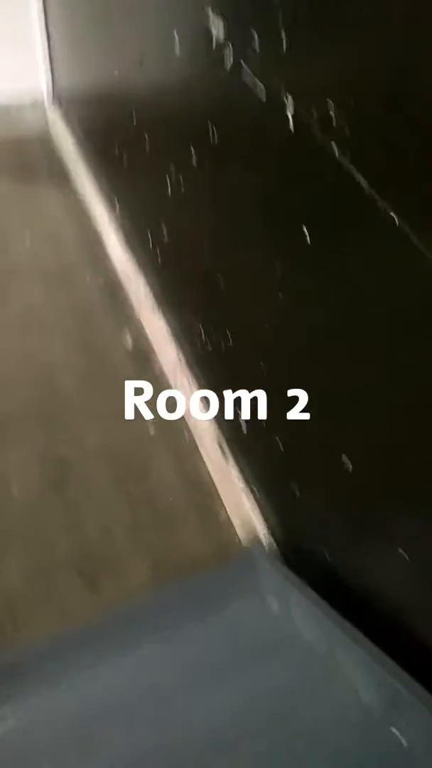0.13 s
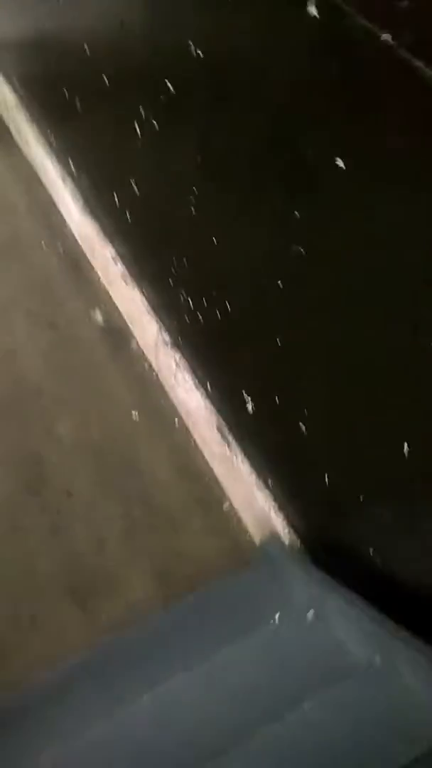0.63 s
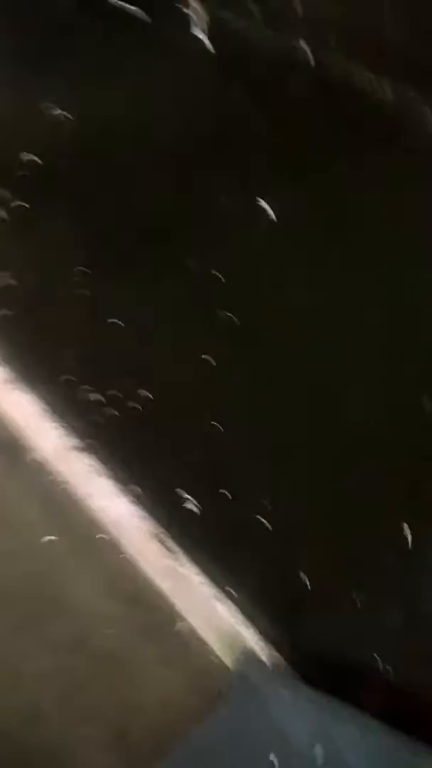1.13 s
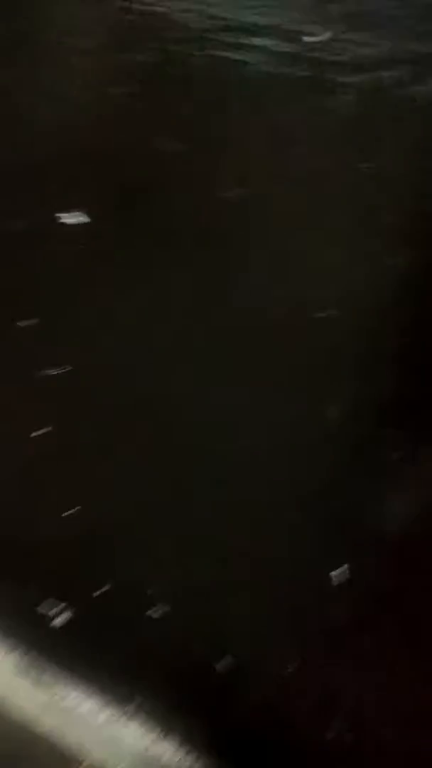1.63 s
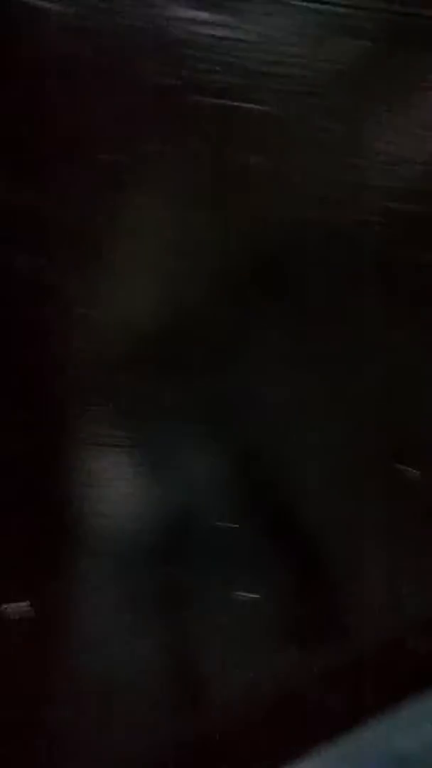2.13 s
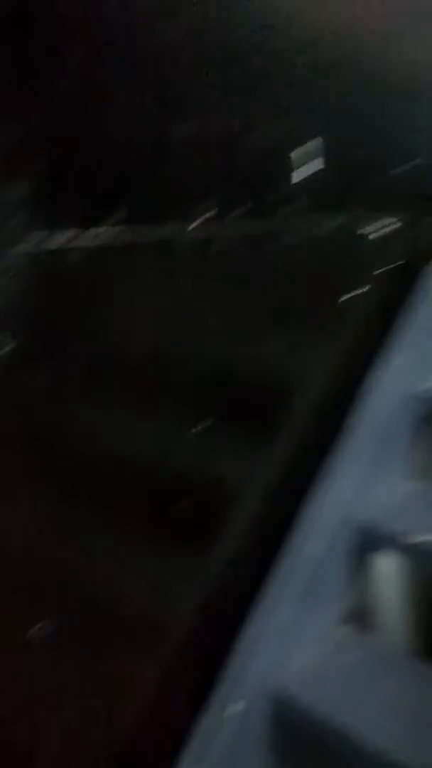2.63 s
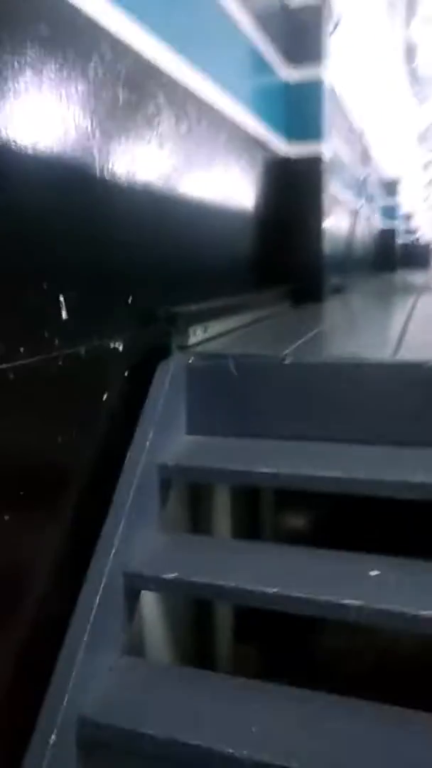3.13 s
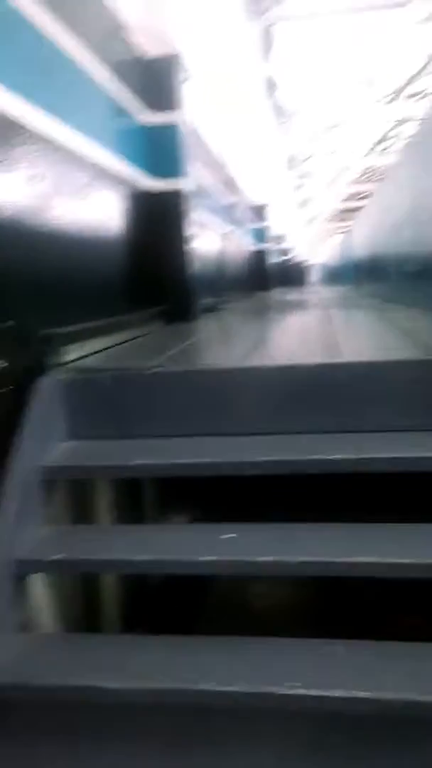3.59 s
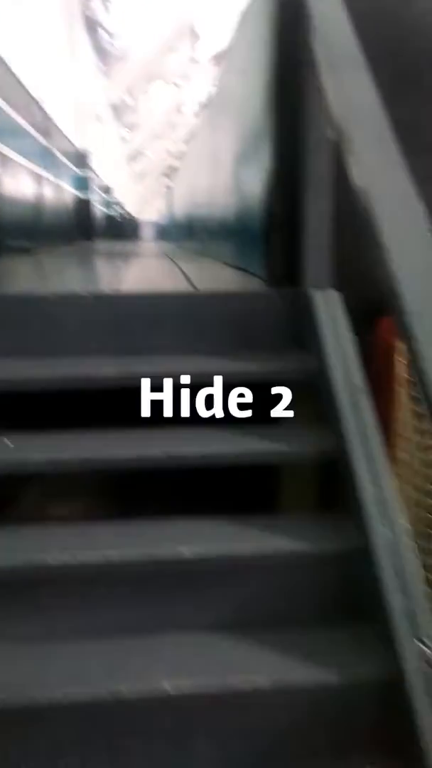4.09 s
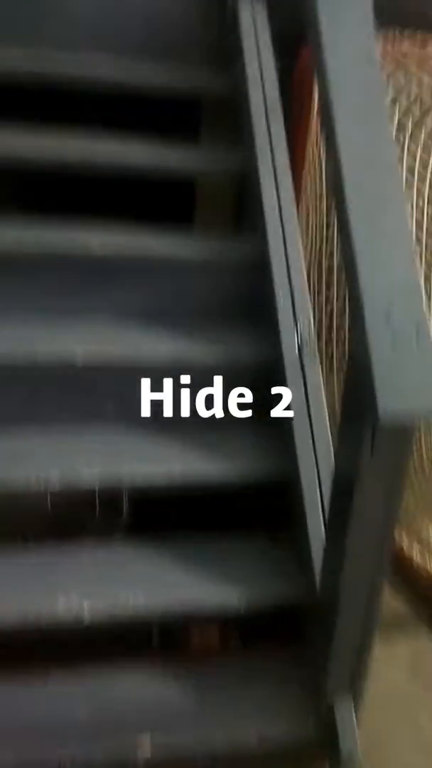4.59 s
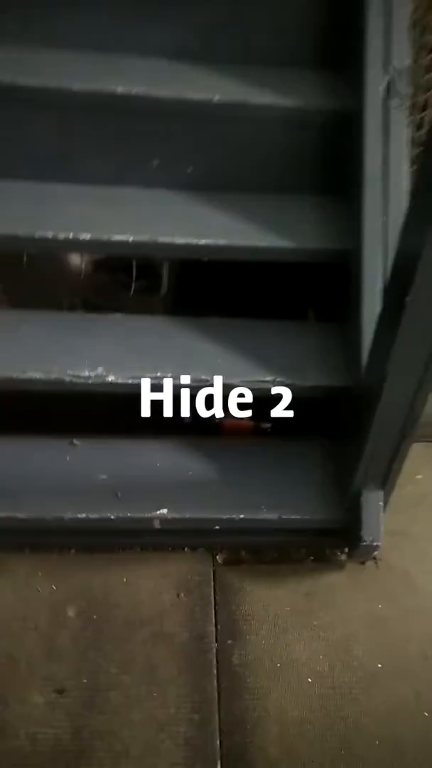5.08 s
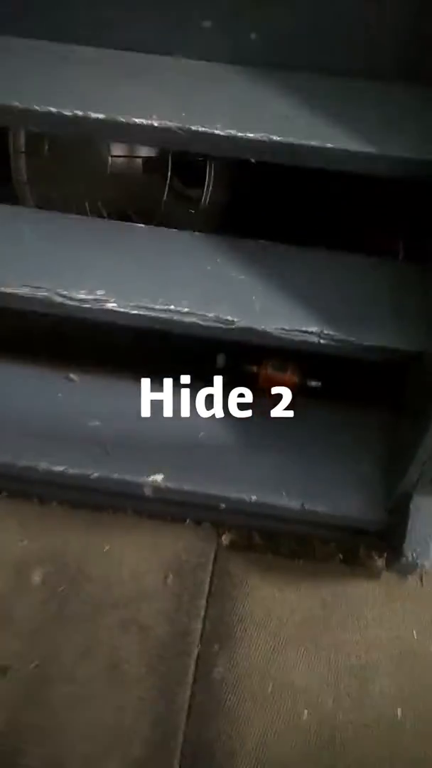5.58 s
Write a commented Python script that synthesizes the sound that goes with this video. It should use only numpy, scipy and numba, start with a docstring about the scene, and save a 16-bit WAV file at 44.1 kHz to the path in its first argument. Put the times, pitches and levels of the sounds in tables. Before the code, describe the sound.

Close handheld phone microphone in a hard-walled indoor hall. Shoes scuff gritty concrete with cloth rustle and low grip rumble; two loud, sharp cracking knocks come within the first second, followed by softer scrapes and clicks until about two and a half seconds. Then the walker slows, leaving faint shuffles and small taps over steady low building hum and hiss.

```python
"""Footsteps on gritty concrete

Someone walks over a gritty concrete floor in a hard hall with a phone in the hand, then slows to a shuffle.
Knocks, short squeaks and lingering rings come from modes of shoe and floor, grit snaps under the soles, and
grainy noise makes the scuffs with their long dying tails. Close to the microphone clothes rustle and the grip
rumbles in the phone's body; the hall murmurs with the movement and echoes the steps. Filtered noise and
wavering tones give the building's hiss, hum and whine."""
import sys
import numpy as np
from scipy import signal
from scipy.fft import rfft, irfft, next_fast_len
from scipy.io import wavfile
from scipy.ndimage import uniform_filter1d
from numba import njit

SR = 44100
rng = np.random.default_rng(int(sys.argv[2]) if len(sys.argv) > 2 else 0)


def file_out(sig):
    """Save sig as 16-bit WAV at sys.argv[1]."""
    # one column per channel
    cols = np.atleast_2d(sig).T
    # limit, then scale
    lim = np.clip(cols, -1, 1)
    pcm = np.round(lim * 32767).astype(np.int16)
    wavfile.write(sys.argv[1], SR, pcm)


def voltage_ratio(decibels):
    """Convert decibels (scalar or array-like) to amplitude ratios, 20 dB per decade."""
    exponent = np.asarray(decibels, float) / 20
    return 10 ** exponent


N = 252252
TIME = np.arange(N) / SR

# what shoe and floor ring with: f/Hz, relative level/dB, free ring down to a thousandth/ms
FLOOR_MODES = [(110, 0, 110), (140, -6.5, 47), (170, -2.5, 110), (208.8, -0.5, 100), (270, 5.5, 60),
               (326, 7, 61), (390, -3, 160), (480, 4, 44), (564.3, 0.5, 49), (626.5, 1.5, 67), (745, 2, 78),
               (939, -3, 70), (1152, -2.5, 32), (1337, -4.5, 29), (1533, 0.5, 33), (1770, -0.5, 23),
               (1960, -1.5, 28), (2140, -6.5, 55), (2460, -2, 40), (2633, 3.5, 35), (2962, 0, 19),
               (3450, 2, 24)]
# spectrum of the bright part of scuffs and cloth: f/Hz, relative level per Hz/dB
TREBLE_SPECTRUM = [(1290, -36), (2200, -4.5), (2450, -12), (2660, -9), (3560, -11.5), (4350, -4.5),
                   (4680, -6), (5570, -3), (6210, -4), (7840, 1.5), (9890, -3), (14100, -18),
                   (16000, -26.5)]
# spectrum of their duller body: f/Hz, relative level per Hz/dB
BODY_SPECTRUM = [(240, -34), (400, -5.5), (1020, -6.5), (1360, -8.5), (1500, -8), (2060, -10),
                 (2670, -14.5), (2910, -10.5), (4000, -13.5), (5200, -41.5), (8800, -120)]


def level(x, db):
    """Scale to an rms level."""
    return x * voltage_ratio(db) / np.sqrt(np.mean(x ** 2))


def colour(x, spectrum):
    """Filter by (Hz, dB) points joined on a log-frequency axis; rms 1."""
    hz, db = np.transpose(spectrum)
    size = next_fast_len(len(x))
    f = np.maximum(np.arange(size // 2 + 1) * SR / size, 1)
    gain = voltage_ratio(np.interp(np.log(f), np.log(hz), db))
    return level(irfft(rfft(x, size) * gain, size)[:len(x)], 0)


def walk(rate):
    """Random levels held 1 / rate s and slewed twice; spread near 1."""
    k = int(SR / rate)
    held = np.repeat(rng.standard_normal(N // k + 1), k)
    return 1.31 * uniform_filter1d(uniform_filter1d(held, k), k)[:N]


def grit(spread_db):
    """Dense noise grains whose sizes differ widely, by an exponential scatter in dB."""
    return rng.standard_normal(N) * voltage_ratio(spread_db * rng.exponential(size=N))


def add(out, s, piece):
    """Mix a piece in at time s."""
    i = int(s * SR)
    out[i:i + len(piece)] += piece[:N - i]


def fall(t, ring_ms):
    """Exponential decay that reaches a thousandth after ring_ms."""
    return np.exp(-np.log(1000) * np.maximum(t, 0) * 1000 / ring_ms)


def resonate(x):
    """Drive the modes of shoe and floor, each a one-pole complex resonator, with a signal; rms 1."""
    out = 0
    for hz, db, ring_ms in FLOOR_MODES:
        pole = np.exp(2j * np.pi * hz / SR - np.log(1000) * 1000 / (ring_ms * SR))
        ring = signal.lfilter([1], [1, -pole], x + 0j).imag
        out = out + voltage_ratio(db) * ring / np.sqrt(ring_ms)
    return level(out, 0)


def building():
    """Smooth far hiss from filtered noise, with machine tones that waver in pitch and level."""
    # far hiss of the hall: f/Hz, relative level per Hz/dB
    hall_spectrum = [(15, -54), (25, -23), (70, -1), (135, -12), (177, -25), (238, -14), (358, -27),
                     (510, -25), (1150, -22.5), (1640, -22), (2670, -26.5), (15200, -28.5), (16500, -39)]
    # building machinery: f/Hz, spread of the pitch wander/Hz, mid level/dB
    machine_tones = [(68, 7.2, -71.5), (128.5, 16, -73), (9600, 15, -83.5)]
    out = level(colour(rng.standard_normal(N), hall_spectrum), -67)
    for hz, wander_hz, db in machine_tones:
        drift = np.cumsum(wander_hz * walk(8.5)) / SR
        tone = np.sqrt(2) * np.sin(2 * np.pi * (hz * TIME + drift))
        out = out + voltage_ratio(db + 2.0 * walk(5.4)) * tone
    return out


def walker():
    """Cloth hisses in grains, the grip shakes the phone with deep noise, the hall murmurs with the movement."""
    # motion of the walker: t/s, cloth rustle/dB, grip rumble/dB, low murmur of the hall/dB
    motion = [(0.0, -55.5, -51, -57.5), (0.29, -67.5, -45, -67), (0.4, -52, -47, -49.5),
              (0.6, -61, -58, -69.5), (0.75, -70, -43.5, -44.5), (0.88, -65, -53, -63.5),
              (1.17, -50.5, -45.5, -45.5), (1.31, -54.5, -51, -57), (1.62, -64.5, -44, -52),
              (1.69, -63, -52.5, -66.5), (1.91, -64.5, -47, -83), (2.05, -52, -46, -44.5),
              (2.2, -62, -56.5, -71), (2.45, -65.5, -60, -68.5), (3.299, -75, -70, -75.5),
              (3.729, -69.5, -66.5, -71), (3.94, -76, -68.5, -72.5), (4.78, -73, -70, -71),
              (5.44, -66.5, -68.5, -75), (5.55, -70.5, -66.5, -76), (5.72, -69, -69.5, -83)]
    # grip rumble in the phone's body: f/Hz, relative level per Hz/dB
    rumble_spectrum = [(15, -39.5), (25, -11), (49, 3.5), (75, 1.5), (132, -2), (189, -6), (250, -15.5),
                       (320, -40), (550, -120)]
    murmur_spectrum = [(100, -20.5), (200, -0.5), (400, -1.5), (800, -7.5), (1600, -36.0)]
    s, *columns = np.transpose(motion)
    cloth_db, grip_db, murmur_db = (np.interp(TIME, s, c) for c in columns)
    rustle = colour(grit(2.1), TREBLE_SPECTRUM) + voltage_ratio(-4.5) * colour(grit(0.42), BODY_SPECTRUM)
    cloth = voltage_ratio(cloth_db + 0.79 * walk(35)) * rustle
    grip = voltage_ratio(grip_db + 1.8 * walk(14)) * colour(rng.standard_normal(N), rumble_spectrum)
    murmur = colour(rng.standard_normal(N), murmur_spectrum)
    # the floor's modes colour it
    murmur = level(murmur + voltage_ratio(-7.0) * resonate(murmur), 0)
    return cloth + grip + voltage_ratio(murmur_db + 0.75 * walk(42)) * murmur


def scuffs():
    """Grainy friction noise that rises, stutters along and dies away; it also drives the floor's modes."""
    # scuffs of the soles and their long dying tails:
    # t/s, top gain of the treble/dB, gain of the body against it/dB, hold with the rise/ms, fade/ms
    scuff_table = [(0, -32.5, -8, 4.7, 190), (0.196, -44.5, 0.5, 10, 140), (0.235, -34, -1, 6.5, 150),
                   (0.27, -21, -8, 11.6, 150), (0.298, -22, -12, 13.5, 72), (0.314, -28.5, -8.5, 9.6, 620),
                   (0.395, -16, -13, 8.7, 225), (0.639, -22.5, -3.5, 6.8, 260), (0.666, -11.5, -1, 3, 94),
                   (0.699, -19.5, 5, 7.5, 100), (0.711, -23, -4, 17, 300), (0.957, -17.5, 7.5, 2.5, 96),
                   (1.005, -27, 4, 13, 87), (1.049, -31, -7, 7.1, 140), (1.086, -18, -5, 16.7, 324),
                   (1.128, -23.5, -17, 9.9, 180), (1.213, -16.5, -10, 9.1, 120),
                   (1.236, -27.5, -10, 12, 450), (1.496, -20, -6, 7.5, 205), (1.547, -27, -13, 12, 270),
                   (1.589, -32.5, 0.5, 9, 74), (1.871, -40, 6.5, 8.1, 130), (1.899, -32.5, 0.5, 3.2, 190),
                   (1.939, -21, -7, 7.9, 85), (1.955, -20, -11, 8, 170), (2.014, -14.5, -11, 15, 107),
                   (2.037, -27, -5.5, 13, 320), (2.173, -48.5, 3.5, 8.8, 250), (2.4, -59.5, 19.5, 16, 80),
                   (2.427, -27, -6.5, 5.5, 206), (2.517, -45, 3, 31, 160), (2.55, -61, 9, 19, 1100),
                   (2.87, -43, -1, 14, 170), (3.089, -42, -4.5, 69, 210), (3.561, -37.5, -8, 7.2, 280),
                   (3.791, -50.5, -0.5, 64, 230), (4.17, -38, -8.5, 9.5, 100), (4.186, -39.5, -9, 15, 130),
                   (4.212, -48.5, -4, 27, 400), (4.269, -41.5, -9.5, 24, 120), (4.285, -36.5, -10, 29, 210),
                   (5.454, -43.5, -4, 13, 80)]
    top, high, middle, low, t = np.zeros(N), np.zeros(N), np.zeros(N), np.zeros(N), TIME[:SR // 2]
    for s, db, body_db, hold_ms, fade_ms in scuff_table:
        rise_ms = 0.26 * hold_ms
        shape = np.minimum(1000 * t / rise_ms, 1) ** 2 * fall(t - hold_ms / 1000, fade_ms)
        add(high, s, voltage_ratio(db) * shape)
        # a faint row is duller at the very top
        add(top, s, voltage_ratio(db + 0.13 * (db + 19.5)) * shape)
        add(middle, s, voltage_ratio(db + body_db) * shape)
        # a faint row hardly loads the floor, so its low end drops away faster than its level
        add(low, s, voltage_ratio(db + body_db + 0.17 * (db + 26)) * shape)
    body = colour(grit(3.1), BODY_SPECTRUM)
    body = level(body + voltage_ratio(-6.5) * resonate(body), -14)
    deep = signal.sosfilt(signal.butter(2, 1000., fs=SR, output="sos"), body)
    # the peaks of the grain stand well over its mean level
    hiss = level(colour(grit(1.3), TREBLE_SPECTRUM), -17)
    sizzle = signal.sosfiltfilt(signal.butter(2, 9500., "high", fs=SR, output="sos"), hiss)
    # the stutter of the treble and of the body
    slip = voltage_ratio(1.6 * walk(120) + 2.2 * walk(700))
    shake = voltage_ratio(2.0 * walk(130))
    treble = high * (hiss - sizzle) + top * sizzle
    return slip * treble + shake * (middle * (body - deep) + low * deep)


def knocks_and_rings():
    """Each sound rings the modes near its centre: a wide spread knocks, a narrow one squeaks or lingers."""
    # knocks, short squeaks and lingering rings of shoe and floor:
    # t/s, peak level/dB, centre f/Hz, spread/octaves
    ring_table = [(0.206, -39, 123, .54), (0.234, -27.5, 375, .45), (0.234, -31.5, 2640, 0.94),
                  (0.236, -31.5, 910, 0.23), (0.258, -32.5, 220, 0.4), (0.398, -38.5, 554, 0.54),
                  (0.642, -23, 130.7, 0.15), (0.642, -23.5, 363, 0.77), (0.667, -29.5, 815, 0.62),
                  (0.681, -27, 450, 0.73), (0.697, -21.5, 450, 0.61), (0.698, -20, 1500, 0.65),
                  (0.7085, -14.5, 1660, 0.73), (0.952, -19.5, 580, 0.55), (0.954, -8, 1620, 0.65),
                  (0.968, -25, 390, 0.26), (1.012, -19.5, 144, 0.79), (1.049, -31, 1020, 0.34),
                  (1.05, -27.5, 181, .65), (1.066, -24.5, 221, 0.38), (1.11, -33, 201, 0.41),
                  (1.158, -35.5, 170, 0.64), (1.215, -34.5, 850, 0.14), (1.217, -40, 483, 0.071),
                  (1.217, -30, 1835, 0.1), (1.262, -38.5, 403, 0.1), (1.37, -45, 390, 0.082),
                  (1.5, -22.5, 355, 0.64), (1.4989, -22, 2500, .6), (1.502, -34.5, 950, 0.17),
                  (1.545, -38.5, 386, 0.17), (1.869, -25.5, 636, 0.22), (1.876, -30.5, 379, 0.29),
                  (1.899, -32, 403, .5), (1.94, -36.5, 480, 0.52), (1.939, -38, 2120, 0.21),
                  (2.017, -32.5, 554, 0.097), (2.018, -32, 2010, 0.29), (2.182, -43, 570, 0.43),
                  (2.397, -36, 155, 1.34), (2.3963, -38.5, 1630, 0.67), (2.411, -46, 503, .8),
                  (2.44, -40.5, 570, 0.24), (2.459, -42.5, 205, 0.36), (2.528, -50.5, 447, .37),
                  (2.569, -51, 407, 0.22), (2.851, -51.5, 161, 0.97), (2.857, -38, 1900, .8),
                  (2.862, -46, 1100, .3), (3.008, -54, 180, 0.6), (3.025, -48, 703, 1),
                  (3.112, -56, 1750, .12), (3.145, -52, 1750, 0.13), (3.5607, -30, 547, 0.22),
                  (3.561, -47.5, 1100, 0.29), (3.571, -40, 237, 0.33), (3.795, -55, 520, .4),
                  (3.82, -52, 500, .2), (3.832, -47.5, 550, .2), (4.174, -50.5, 2160, 0.18),
                  (4.221, -47.5, 1600, 0.73), (4.285, -55, 480, 0.27), (4.315, -53, 600, .3),
                  (4.41, -49, 643, 1.05), (4.449, -57.5, 450, 0.61), (4.474, -57.5, 518, 0.37),
                  (5.163, -52, 470, 0.3), (5.28, -54, 189, 0.65), (5.49, -57, 400, 0.66)]
    out, t = np.zeros(N), TIME[:SR // 2]
    hz, mode_db, ring_ms = np.transpose(FLOOR_MODES)[:, :, None]
    for s, db, centre_hz, spread in ring_table:
        # pitch, strength and phase of the modes scatter a little each time
        detune = 0.008 * rng.standard_normal(hz.shape)
        uneven_db = 1.2 * rng.standard_normal(hz.shape)
        phase = 0.6 * rng.standard_normal(hz.shape)  # radians
        distance = np.log2(hz / centre_hz) / spread
        weight = voltage_ratio(mode_db + uneven_db - 6.6 * distance ** 2)
        # a broad sound is flat and damped, a narrow one rings on
        damped_ms = ring_ms * 0.55 * spread ** -0.55
        decay = np.exp(-np.log(1000) * (1000 * t / damped_ms) ** 0.91)
        modes = weight * decay * np.sin(2 * np.pi * hz * (1 + detune) * t + phase)
        # it builds up over about a cycle
        ring = np.sum(modes, axis=0) * np.minimum(t * centre_hz / 1.1, 1)
        add(out, s, voltage_ratio(db) * ring / np.abs(ring).max())
    return out


def cracks():
    """A sudden snap and a few milliseconds of splinters, noise in a band around the grain's own pitch."""
    # grit cracking under a sole: t/s, peak level/dB, centre f/Hz
    snaps = [(0.2339, -18, 5150), (0.642, -17.5, 7000), (0.6667, 4, 8000), (0.6862, -14, 8360),
             (0.6988, -13, 6000), (0.71, -7.5, 5900), (0.9524, -11, 7000), (0.9547, 0.3, 5600),
             (1.0106, -19, 6900), (1.0489, -29, 5520), (1.086, -25, 7540), (1.204, -21, 9000),
             (1.208, -23, 8500), (1.3724, -28.5, 6600), (1.412, -38, 7450), (1.437, -38.5, 6480),
             (1.4994, -19.5, 5200), (1.5484, -22, 7300), (1.6096, -23.5, 6980), (1.8686, -32.5, 3950),
             (1.9003, -41, 5030), (1.925, -26, 9800), (2.024, -17, 7400), (2.3976, -37.5, 6940),
             (2.8595, -26, 7520), (3.0258, -43.5, 7510), (5.446, -43.5, 8070), (5.462, -49.5, 4520)]
    out, t = np.zeros(N), TIME[:SR // 10]
    for s, db, centre_hz in snaps:
        # above -6.5 dB the ring halves every 6.5 dB
        ring_ms = 39 * 0.5 ** (max(db + 6.5, 0) / 6.5)
        splinters = rng.standard_normal(len(t)) * fall(t, ring_ms)
        splinters[0] = 12.7  # the break itself
        band = [centre_hz / 1.8, centre_hz * 1.4]
        snap = signal.sosfilt(signal.butter(2, band, "band", fs=SR, output="sos"), splinters)
        add(out, s, voltage_ratio(db) * snap / np.abs(snap).max())
    return out


@njit
def walls(x, lags, gain, damp):
    """Eight delay lines that feed each other, duller on every round."""
    line, soft, out = np.zeros((8, 4096)), np.zeros(8), np.zeros(len(x))
    for i in range(len(x)):
        total = 0.
        for k in range(8):
            # a one-pole lowpass takes treble from each reflection
            soft[k] += (1 - damp) * (gain[k] * line[k, (i - lags[k]) & 4095] - soft[k])
            total += soft[k]
            out[i] += soft[k] * (1 - 2 * (k % 2))
        for k in range(8):
            line[k, i & 4095] = x[i] + soft[k] - total / 4
    return out


def hall_echo(steps):
    """Hard walls return the steps as a dense echo, with loop gains set for a 60 dB decay time."""
    t60_s, damp = 0.7, 0.21
    lags = np.array([353, 709, 1093, 1531, 1999, 2557, 3163, 3823])  # samples
    gain = voltage_ratio(-60 * lags / SR / t60_s)
    # the tiny offset keeps the silent loops from slowing down
    return voltage_ratio(-21) * walls(steps + 1e-18, lags, gain, damp)


def scene():
    """The building, the walker, and steps with their echo from hard walls."""
    steps = scuffs() + knocks_and_rings() + cracks()
    return (building() + walker() + steps + hall_echo(steps))[None]


def band_limit(x):
    """A steep low-pass at the top of the band."""
    return signal.sosfilt(signal.butter(12, 17000, fs=SR, output="sos"), x)


def record(dry):
    """The phone cuts the deep bass, clips just under full scale and cuts the top above 16 kHz."""
    bass_cut = signal.butter(4, 45, "high", fs=SR, output="sos")
    top_cut = signal.ellip(8, 0.2, 70, 16000, fs=SR, output="sos")
    clipped = np.clip(signal.sosfilt(bass_cut, dry), -0.88, 0.88)
    mix = signal.sosfilt(top_cut, clipped)
    return band_limit(mix)


dry = scene()
out = record(dry)
file_out(out)
```